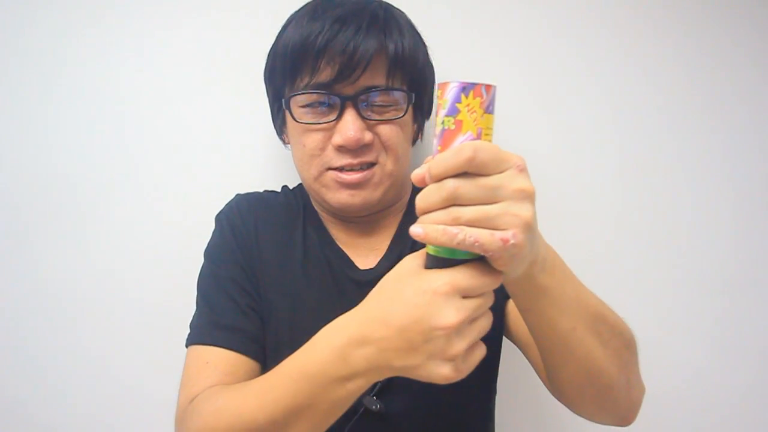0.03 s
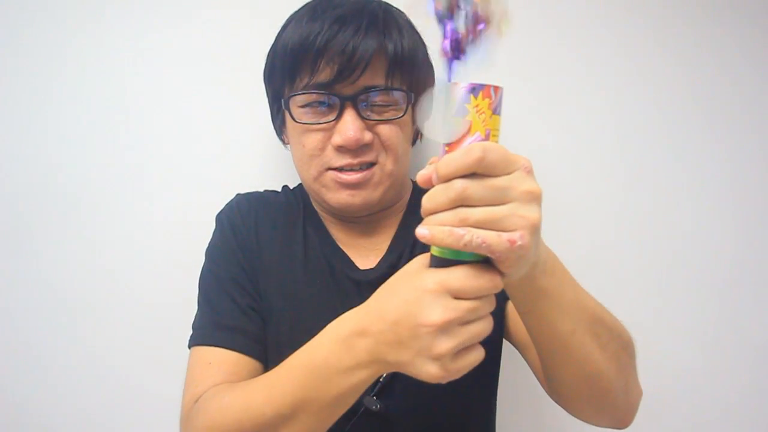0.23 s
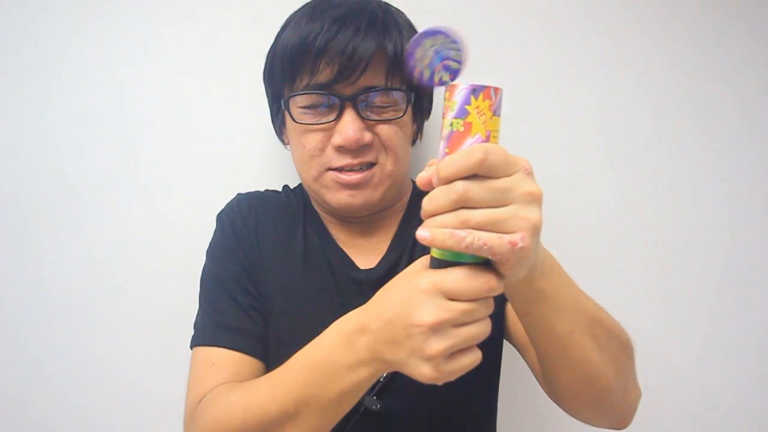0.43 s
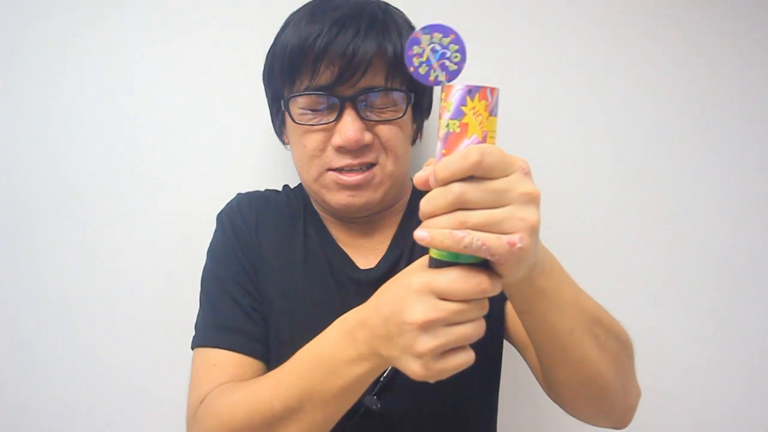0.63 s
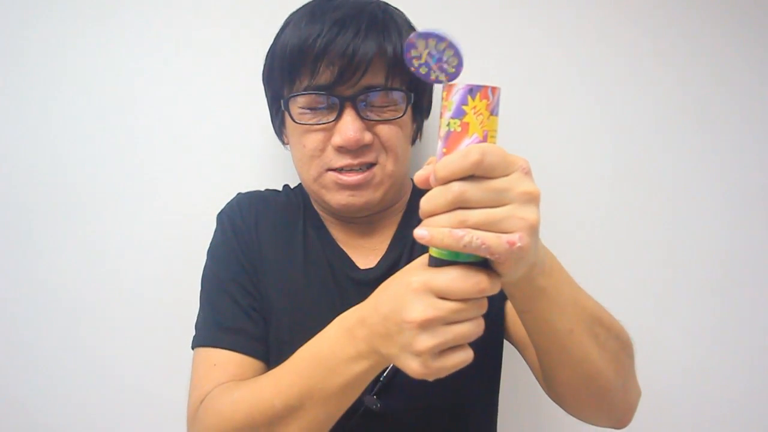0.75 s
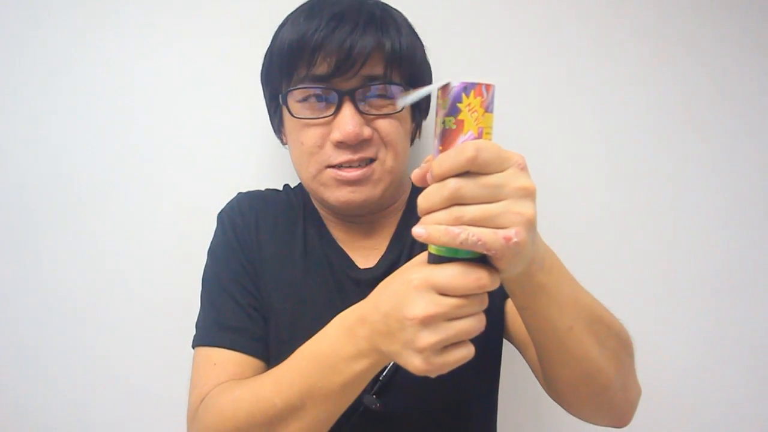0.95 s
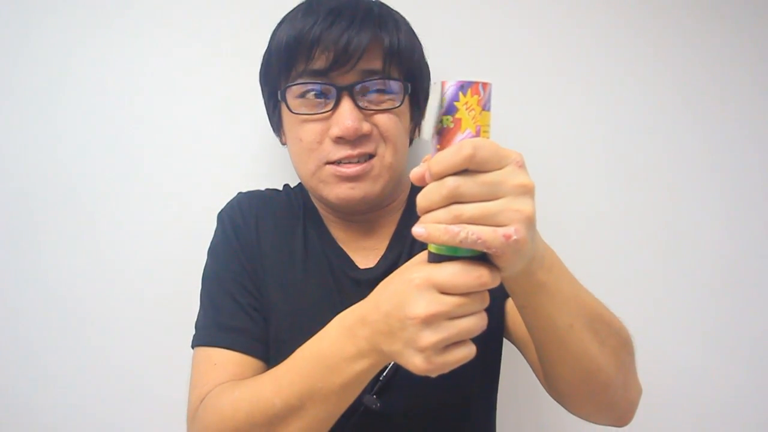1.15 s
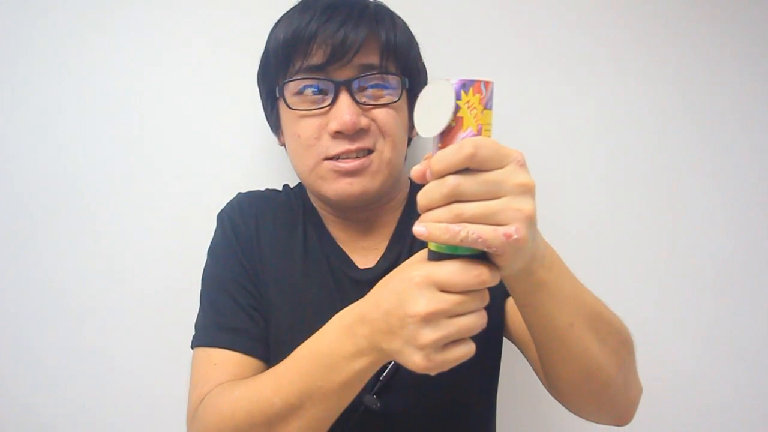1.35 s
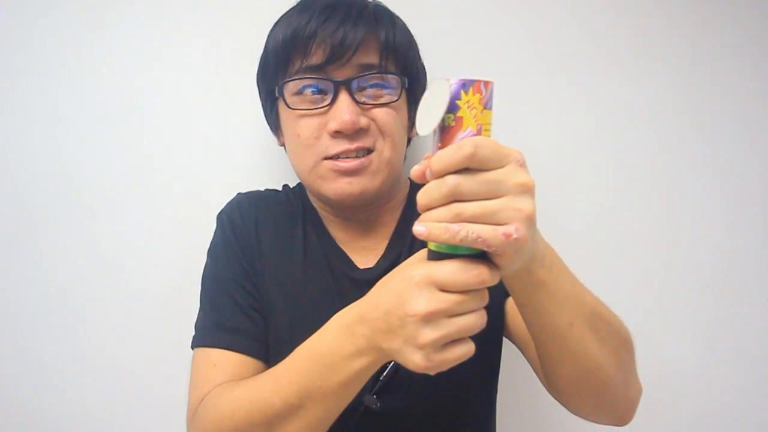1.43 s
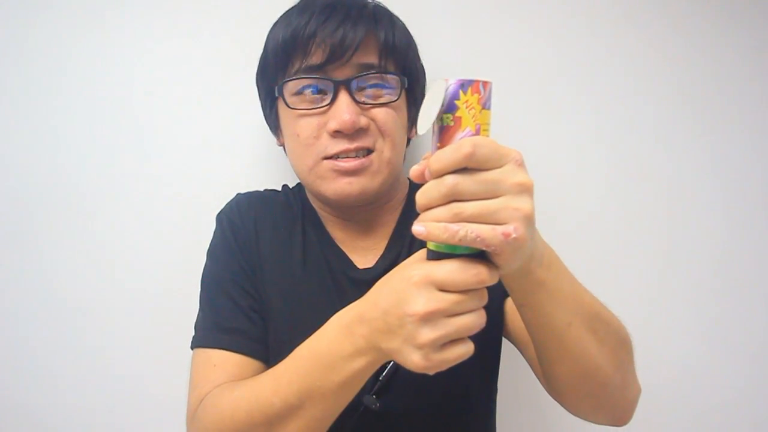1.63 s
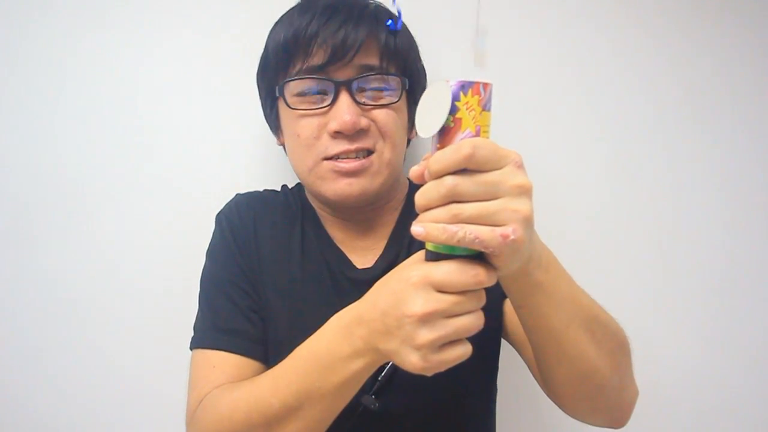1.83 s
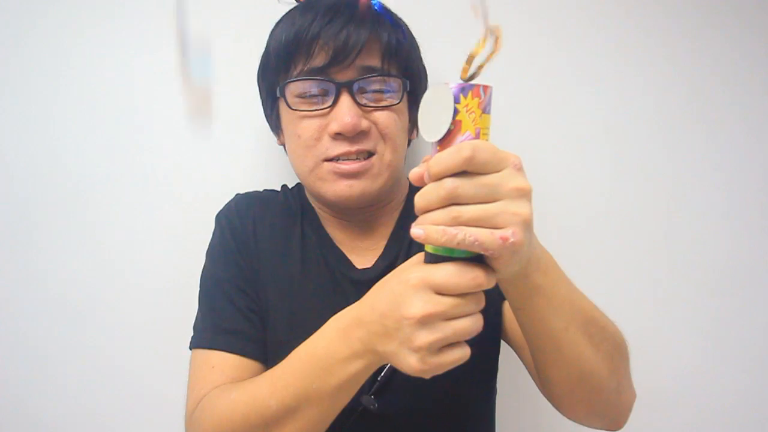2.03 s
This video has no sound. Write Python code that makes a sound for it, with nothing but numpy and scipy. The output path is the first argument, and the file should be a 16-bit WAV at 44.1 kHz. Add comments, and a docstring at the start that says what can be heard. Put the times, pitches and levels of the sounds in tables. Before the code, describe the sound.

A party popper bangs loudly in a bare room, followed by faintly rustling confetti.

```python
"""Party popper in a bare room

A popper fires up close: the cap gives with a thump, then the blast overloads the microphone. The tube and the
room ring on while confetti rustles through the air, the flying cap strikes the wall and a few scraps land. The
empty tube knocks hollowly in the hands, once in the ring-out and softly again near the end. As the tail dies a
low hum swells and a faint tone pulses steadily, perhaps a small motor."""
import sys
import numpy as np
from scipy import signal
from scipy.fft import rfft, irfft
from scipy.io import wavfile

SR = 44100
rng = np.random.default_rng(int(sys.argv[2]) if len(sys.argv) > 2 else 0)


def master(y):
    """Save y as 16-bit WAV."""
    cut = np.clip(np.atleast_2d(y).T, -1, 1)
    pcm = np.round(cut * 32767)  # scale
    wavfile.write(sys.argv[1], SR, pcm.astype(np.int16))


N = 92610
T = np.arange(N) / SR


def amp(db):
    """Decibels to gain."""
    return 10 ** (np.asarray(db) / 20)

def unit_rms(x):
    """Scales to an rms of one."""
    return x / np.sqrt(np.mean(x ** 2) + 1e-20)

def at_hz(table, hz, column=1):
    """Reads one column of a table along a log-frequency axis."""
    columns = np.transpose(table)
    return np.interp(np.log(hz + 1), np.log(columns[0] + 1), columns[column])

def fader(curve):
    """Gain ride through (time [s], level [dB]) points."""
    return amp(np.interp(T, *np.transpose(curve)))

def strike(start, rise, t60, hold=0, clock=T):
    """Envelope with a linear attack, an optional hold and an exponential decay, all in seconds."""
    age = np.maximum(clock - start, 0)
    return np.minimum(age / rise, 1) * amp(-60 * np.maximum(age - hold, 0) / t60)

def pan(db):
    """Left and right gains for a left-minus-right level."""
    return amp(np.array([[db], [-db]]) / 2)

def waver(rate_hz):
    """Slow random drift of level and phase: complex, with an rms of one."""
    lowpass = np.exp(-(np.arange(N) * SR / N / rate_hz) ** 2)
    drift = np.fft.ifft(np.fft.fft(rng.standard_normal(N)) * lowpass)
    return drift / np.sqrt(np.mean(abs(drift) ** 2))

def resonant(x, peaks):
    """Boosts a narrow band at each resonance."""
    return x + sum((amp(db) - 1) * signal.lfilter(*signal.iirpeak(hz, hz / width, SR), x)
                   for hz, width, db in peaks)


# stereo image of the microphone pair (frequency [Hz], correlation [-1..1], left minus right [dB])
STEREO_IMAGE = [(25, .5, 3), (59.7, 1, 0.4), (250, 0.99, 1.4), (448, 0.93, 0.4), (810, 0.95, 3),
                (1300, .75, 5), (2058, 0.2, 2), (3020, -.4, -2.5), (4020, 0.009, 3.5), (5500, 0, 1)]

def coloured(colour, source):
    """Gives two white signals a tone colour and the stereo image, at an rms of one."""
    hz = np.fft.rfftfreq(N, 1 / SR)
    shared, separate = rfft(source)
    correlation = np.clip(at_hz(STEREO_IMAGE, hz), -1, 1)
    lean = amp(at_hz(STEREO_IMAGE, hz, column=2) / 2)
    left = shared * lean
    right = (correlation * shared + np.sqrt(1 - correlation ** 2) * separate) / lean
    return unit_rms(irfft(np.array([left, right]) * amp(at_hz(colour, hz)), N))

def noise(colour):
    """Steady stereo noise of a given tone colour."""
    return coloured(colour, rng.standard_normal((2, N)))

def reflections(bands, start, rise, hold=0):
    """A dense wash of reflections, each frequency decaying at its own speed."""
    frames = dict(fs=SR, nperseg=1024, noverlap=768)
    hz, t, spectrum = signal.stft(noise(bands), **frames)
    t60 = at_hz(bands, hz, column=2)[:, None]
    decay = amp(-60 * np.maximum(t - start - hold, 0) / t60)
    wash = signal.istft(spectrum * decay, **frames)[1][:, :N]
    return wash * np.clip((T - start) / rise, 0, 1)


# colour of the quiet room (frequency [Hz], relative level [dB])
ROOM_TONE_COLOUR = [(10, 6.5), (25, 1.5), (60, -9), (150, -13.5), (280, -14.5), (360, -20.5), (650, -18),
                    (900, -12), (1500, -15.5), (1900, -22), (2400, -18.5), (3100, -27.5), (4500, -33),
                    (6000, -41.5)]

def room_tone():
    """A steady, bass-heavy bed of noise."""
    return amp(-51) * noise(ROOM_TONE_COLOUR)


# swell of the hum (time [s], level [dB])
HUM_SWELL = [(.88, -80), (.97, -45), (1.25, -51.5), (1.35, -59.5), (1.7, -68.5), (2.1, -67)]

def low_hum(hz=200, width_hz=18):
    """A narrow, wavering band that swells faintly in the tail."""
    band = (waver(width_hz) * np.exp(2j * np.pi * hz * T)).real
    return fader(HUM_SWELL) * unit_rms(band)


# level ride of the pulsing tone (time [s], level [dB])
PULSE_RIDE = [(1.17, -48), (1.33, -42.5), (1.72, -43), (1.96, -46), (2.04, -48.5)]
# partials of each pulse (frequency [Hz], relative level [dB], left minus right [dB])
PULSE_CLUSTER = [(786, -14.5, -3), (876, -2, 4.5), (990, -2, 7), (1047, -7, 10), (1223, -9, 7)]

def pulsing_tone(start_s=1.1738, period_s=.07847):
    """Short, even pulses of close partials that beat, with a touch of room reverb."""
    age = (T - start_s) % period_s
    envelope = strike(0, rise=.0011, t60=.058, hold=.011, clock=age) * (T > start_s)
    cluster = sum(amp(db) * pan(side_db) * np.sin(2 * np.pi * hz * age)
                  for hz, db, side_db in PULSE_CLUSTER)
    pulses = cluster * envelope * fader(PULSE_RIDE)
    impulse = rng.standard_normal((2, N)) * strike(0, rise=.01, t60=.97)
    wet = signal.fftconvolve(pulses, impulse / np.linalg.norm(impulse[0]), axes=1)[:, :N]
    return pulses + amp(-25) * wet


# effort of the twist (time [s], level [dB])
TWIST_RIDE = [(.1, -54), (.15, -64), (.185, -46), (.22, -43), (.25, -76)]
# colour of hands rubbing the tube (frequency [Hz], relative level [dB])
GRIP_COLOUR = [(25, 9.5), (80, -8), (200, -3.5), (350, 0), (480, -4.5), (700, -22.5), (3000, -49)]

def hand_twist():
    """A dull rub as the hands twist the tube just before it fires."""
    return fader(TWIST_RIDE) * noise(GRIP_COLOUR)


# knocks of the tube in the hands (time [s], level [dB])
TUBE_KNOCKS = [(.005, -56), (.148, -59), (0.526, -26.5), (1.926, -41.5)]

def tube_knocks(hz=425.3):
    """At each knock the air in the tube swells, holds and dies at one hollow pitch."""
    knocks = 0
    for start, db in TUBE_KNOCKS:
        envelope = strike(start, rise=.0056, t60=.11, hold=.028)
        knocks += amp(db) * envelope * np.sin(2 * np.pi * hz * (T - start))
    return knocks


# rustle of the airborne confetti (time [s], level [dB])
RUSTLE_RIDE = [(.5, -68.5), (.62, -41.5), (.73, -40), (.83, -46.5), (.95, -47), (1.1, -53.5), (1.3, -61.5),
               (1.6, -83.5)]
# colour of the paper (frequency [Hz], relative level [dB])
PAPER_COLOUR = [(300, -25), (1500, -1.5), (2600, 5.5), (3600, 0.5), (4600, -5), (5600, -13)]

def confetti_rustle(ticks_per_s=2000, spread_db=4):
    """Flakes in the air make a cloud of tiny paper ticks, a few louder than the rest."""
    ticks = (rng.random((2, N)) < ticks_per_s / SR) * rng.standard_normal((2, N))
    accents = amp(spread_db * np.minimum(rng.exponential(1, N), 3))
    return coloured(PAPER_COLOUR, ticks * accents) * fader(RUSTLE_RIDE)


# light hits: the cap striking the wall (first two rows), then larger scraps landing (time [s], level [dB])
LIGHT_HITS = [(0.584, -39), (0.59, -33.5), (.609, -46.5), (.727, -47), (1.548, -67), (1.743, -60),
              (1.925, -59), (1.942, -65)]
# resonances of each hit (frequency [Hz], width [Hz], boost [dB])
HIT_PEAKS = [(1200, 460, 7), (2300, 377, 8.5), (3460, 320, 10)]

def light_hits():
    """Each hit, the cap against the wall or a scrap landing, is a short, resonant burst of paper-coloured
    noise."""
    taps = sum(amp(db) * strike(start, rise=.0018, t60=.098) for start, db in LIGHT_HITS)
    return resonant(noise(PAPER_COLOUR), HIT_PEAKS) * taps


BANG_S = .233  # cue for the reverb, the ring and the blast
# reverb of the bare room (frequency [Hz], relative level [dB], t60 [s])
REVERB_BANDS = [(25, -10.5, 2.6), (68.1, 0, 0.97), (120, 0.5, 1.5), (165, -11, 2), (226.4, -5, 1.2),
                (269, -4, 1.5), (340, -18, 2.12), (580, -14.5, 2.054), (830, -4, 1.57), (1000, 2.5, 1.31),
                (1140, -10, 1.58), (1598, -12, 1.8), (2490, -14, 1.544), (3180, -23, 1.3),
                (4180, -20.5, 0.92), (4700, -34.5, 1), (6000, -47, 0.79)]

def room_reverb():
    """The long tail blooms behind the bang."""
    return amp(-8.5) * reflections(REVERB_BANDS, BANG_S, rise=.09)


# modes of tube and room (frequency [Hz], level [dB], t60 [s])
RING_MODES = [(74.6, -33, 1.8), (115.1, -14.5, 0.77), (155, -10.5, 0.2), (243.4, -17, .7),
              (279.7, -26, 2.1), (285, -0.5, .6), (401.6, -9.5, 0.71), (483.4, -16, 0.68),
              (750, -18.5, 0.8), (989, -17, 1.1), (979.4, -17.5, 1.2), (1130, -19.5, .7),
              (1248, -15.5, 0.83), (3186, -20, .35), (3996, -20.5, 0.19)]

def ring_out(waver_depth=.7):
    """The bang sets tube and room ringing, each mode wavering as it decays."""
    ring = 0
    for hz, db, t60 in RING_MODES:
        carrier = np.exp(2j * np.pi * (hz * T + rng.random()))
        tone = (carrier * (1 + waver_depth * waver(rate_hz=14))).real
        envelope = strike(BANG_S, rise=.012, t60=t60)
        ring += amp(db) * tone * envelope * pan(at_hz(STEREO_IMAGE, hz, column=2))
    return ring


# colour of the cap's thump (frequency [Hz], relative level [dB])
CAP_COLOUR = [(30, -18), (120, -10), (250, 1.5), (450, -3), (560, -14), (750, -2.5), (1100, -15),
              (2000, -23), (4400, -26), (5000, -46)]

def cap_thump():
    """The cap gives with a low-mid thump just ahead of the blast."""
    return amp(-7) * noise(CAP_COLOUR) * strike(start=.2205, rise=.0074, t60=.26)

def air_push(start_s=.243, swing_s=.025):
    """One deep swing of pressure as the gas leaves the tube."""
    progress = np.maximum(T - start_s, 0) / swing_s
    return -amp(-1) * progress * (2 - progress) * np.exp(-progress)


# blast with its early reflections (frequency [Hz], relative level [dB], t60 [s])
BLAST_BANDS = [(25, -10, .6), (60, -17, 0.21), (132, -5.5, 0.94), (210, -1.5, 0.18), (262, -2, 0.78),
               (317, -5, 0.21), (406, 0, 0.62), (583.6, -10.5, 0.31), (850, -6.5, 0.64),
               (1272, -11.5, 0.79), (2230, -13.5, 0.5), (3035, -15, 0.4), (4060, -20.5, .26),
               (5026, -22.5, .21), (6030, -18.5, .2)]
# resonances of the tube's bore (frequency [Hz], width [Hz], boost [dB])
BORE_PEAKS = [(1296, 27, 4), (1642, 90, 4.5), (2250, 120, 4), (2727, 100, 0), (3160, 50, 9), (3800, 75, 1),
              (4690, 48, 6.5), (5080, 110, 0)]

def blast():
    """The main hit: a broad burst, coloured by the tube, that holds briefly and decays."""
    burst = reflections(BLAST_BANDS, BANG_S, rise=.011, hold=.035)
    return amp(1) * resonant(burst, BORE_PEAKS)


def scene():
    """Mixes the bed, the handling, the paper and the pop."""
    bed = room_tone() + low_hum() + pulsing_tone()
    handling = hand_twist() + tube_knocks()
    paper = confetti_rustle() + light_hits()
    pop = room_reverb() + ring_out() + cap_thump() + air_push() + blast()
    return bed + handling + paper + pop

def low_pass(x, hz):
    """Steep high cut."""
    kernel = signal.firwin(201, hz, window=("kaiser", 8), fs=SR)
    return signal.oaconvolve(x, kernel[None], "same")

def record(dry, knee=.78):
    """A narrow-band microphone saturates its input: only the overload reaches the high treble."""
    mic = low_pass(dry, hz=5750)
    clean = np.clip(mic, -knee, knee)
    saturated = clean + (1 - knee) * np.tanh((mic - clean) / (1 - knee))
    softened = signal.lfilter(*signal.butter(1, 17000, fs=SR), saturated)
    return low_pass(softened, hz=19500)


dry = scene()
out = record(dry)
master(out)
```